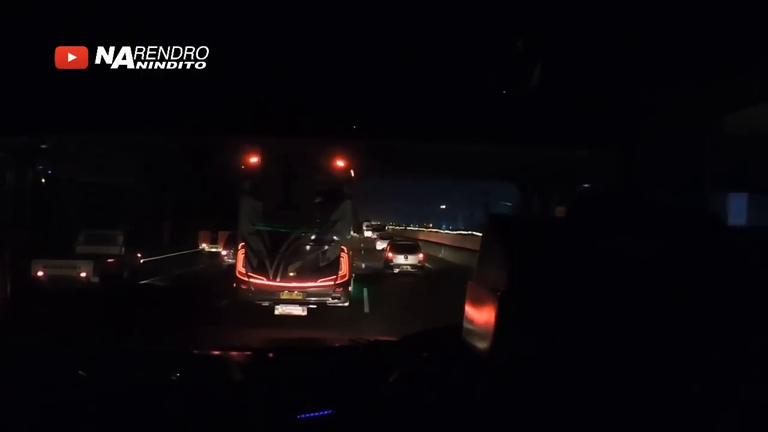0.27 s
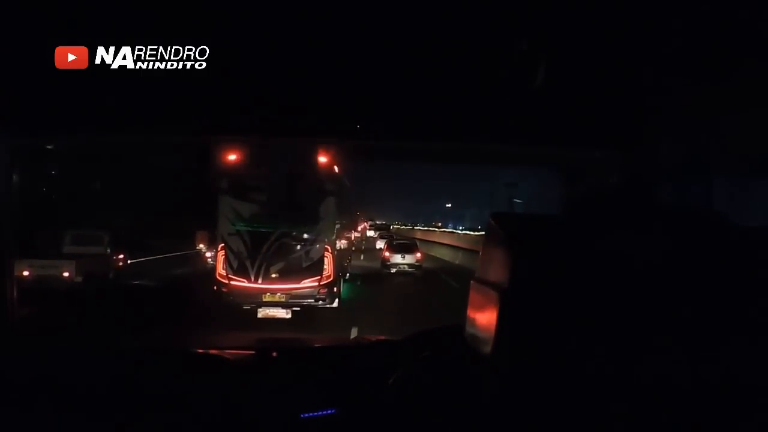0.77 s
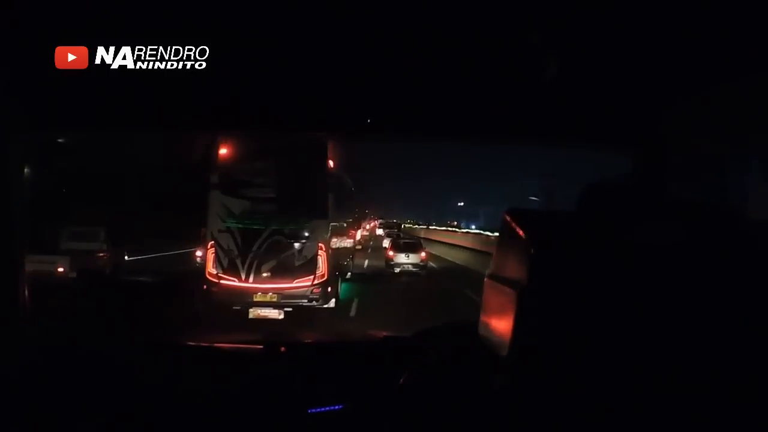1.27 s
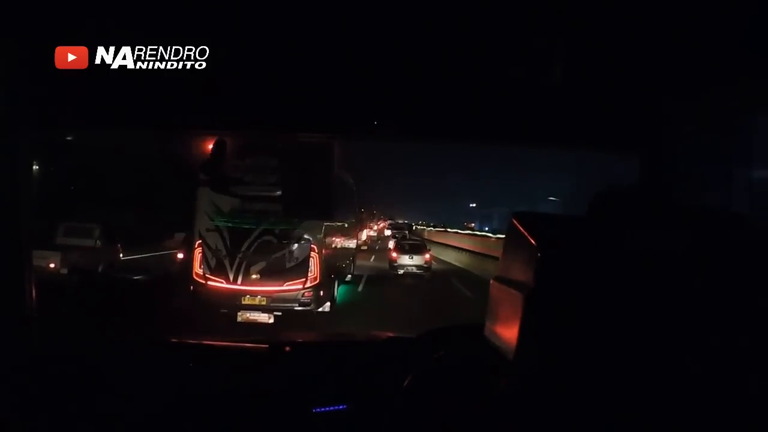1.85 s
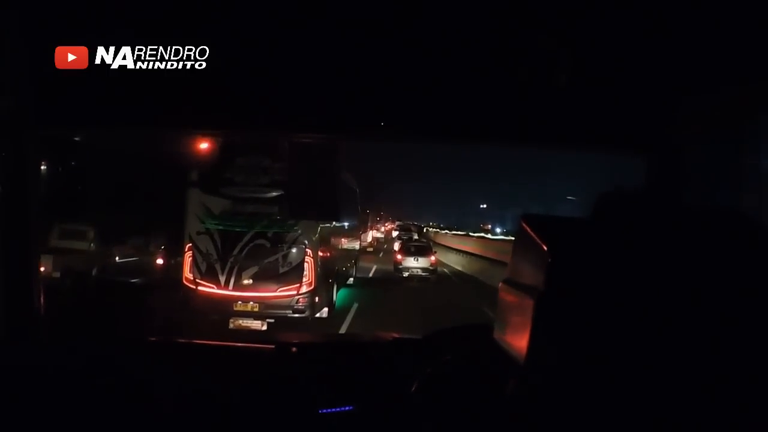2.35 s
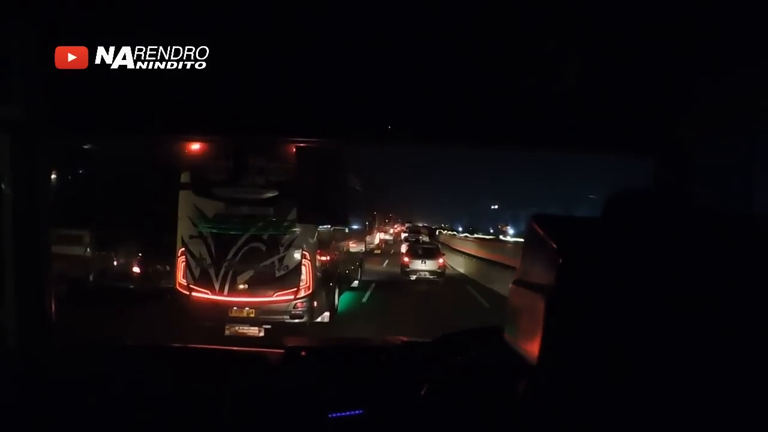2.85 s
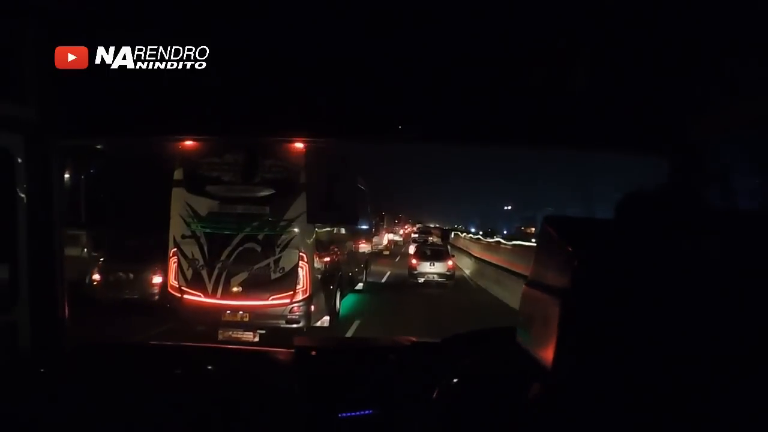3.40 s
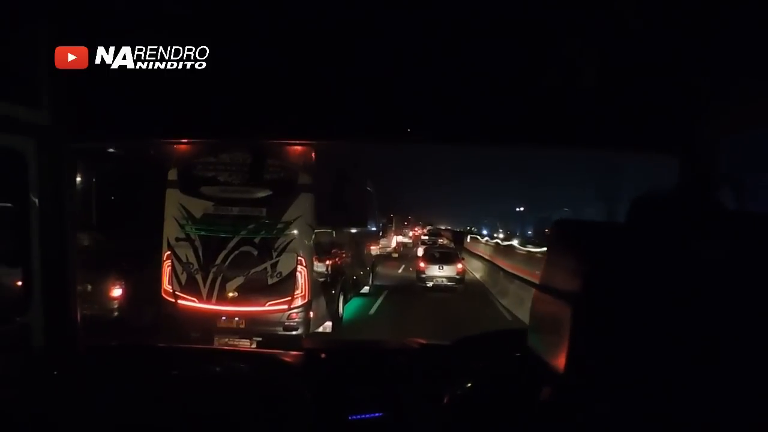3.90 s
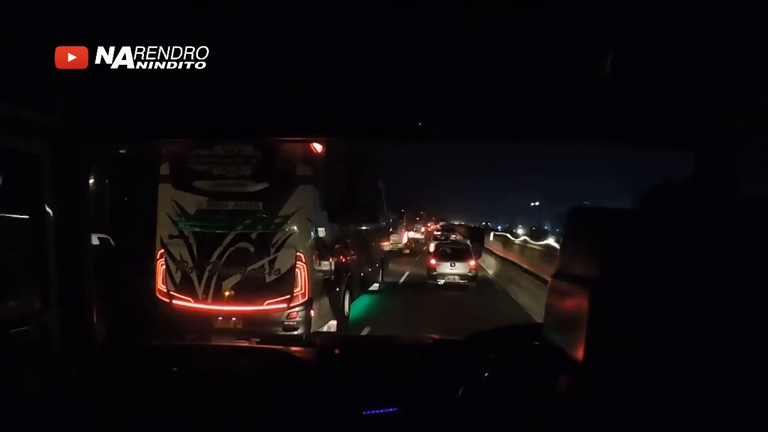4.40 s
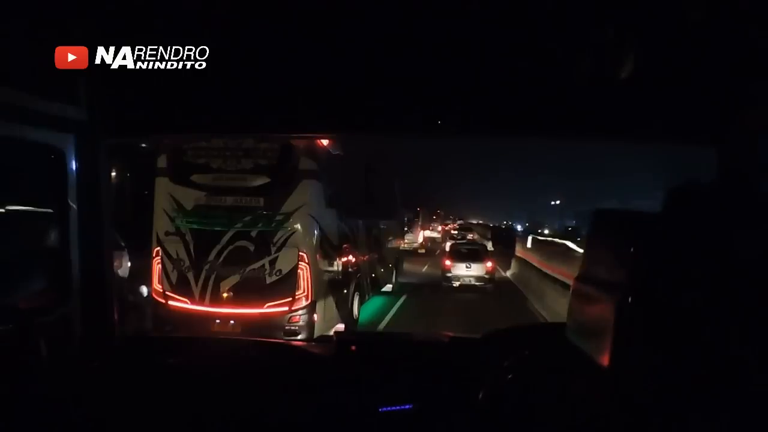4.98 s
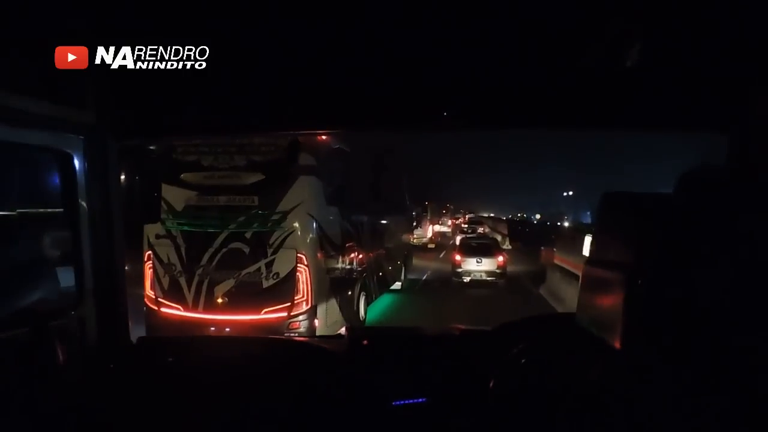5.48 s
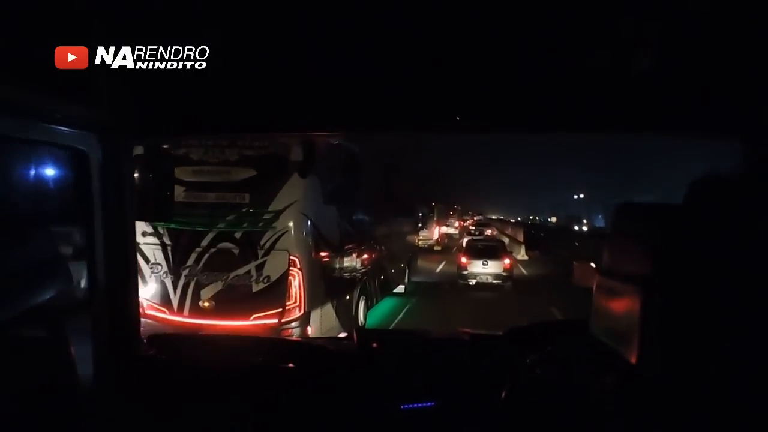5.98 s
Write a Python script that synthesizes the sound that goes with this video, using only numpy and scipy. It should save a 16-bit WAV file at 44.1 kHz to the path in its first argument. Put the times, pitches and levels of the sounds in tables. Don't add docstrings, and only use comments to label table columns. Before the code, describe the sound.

Inside a bus cab in slow night traffic, a low diesel drone around seventy hertz hums through the floor, wavering and rising only slightly in pitch over six seconds. Dull road and engine roar leaks through panels, with very deep, soft jolts throughout. It begins subdued; from about 1.5 to 2 s the engine takes load, the roar swells and a thin gear whine appears. The level dips near 3 s, crests around 3.6 s, then settles; load eases near 5.2 s and pulls briefly at 5.5 s. Faint trim squeaks sound at about 1.1, 2.6, 3.0, 4.3, 5.0, 5.3 and 6.0 s. Dry ticks are clearest at 1.6 and 2.65 s. A barely audible brake tone sings around 2.8-3 s. Quiet fan tones and slowly growing airy hiss persist while automatic microphone gain gently pumps.

```python
import sys
import numpy as np
from scipy import signal
from scipy.fft import rfft, irfft
from scipy.io import wavfile
from scipy.ndimage import uniform_filter1d

SR = 44100
rng = np.random.default_rng(int(sys.argv[2]) if len(sys.argv) > 2 else 0)


def voltage_ratio(decibels):
    exponent = np.asarray(decibels, float) / 20
    return 10 ** exponent


def to_wav(sig):
    pcm = np.clip(np.atleast_2d(sig), -1, 1) * 32767
    pcm = np.round(pcm).astype(np.int16)
    wavfile.write(sys.argv[1], SR, pcm.T)


N = 275625
TIME = np.arange(N) / SR
HZ = np.maximum(np.arange(N // 2 + 1) * SR / N, 1)


def rms_one(x):
    return x / np.sqrt(np.mean(x ** 2) + 1e-20)


def in_time(rows):
    s, *columns = np.transpose(rows)
    return [np.interp(TIME, s, column) for column in columns]


def at_hz(points, hz):
    table_hz, value = np.array(points)[:, 0], np.array(points)[:, 1]
    return np.interp(np.log(hz), np.log(table_hz), value)


def by_load(ends_db, load):
    return ends_db[0] + (ends_db[1] - ends_db[0]) * load


def drift(rate):
    r = np.exp(-80 * np.pi * rate / SR)
    settle = 2000
    slow = signal.lfilter([1], [1, -2 * r, r * r], rng.standard_normal(N // 40 + settle + 2))[settle:]
    return np.interp(np.arange(N) / 40, np.arange(len(slow)), rms_one(slow - slow.mean()))


def resonance(x, hz, width):
    r = np.exp(-np.pi * width / SR)
    zeros = np.array([1, 0, -1]) * (1 - r * r) / 2
    poles = [1, -2 * r * np.cos(2 * np.pi * hz / SR), r * r]
    return signal.lfilter(zeros, poles, x + 1e-18)


def pan(x, lean_db):
    return np.array([x * voltage_ratio(lean_db / 2), x * voltage_ratio(-lean_db / 2)])


def humps(events, rest_db):
    power = voltage_ratio(rest_db) ** 2
    for s, level_db, length, *_ in events:
        bell = np.exp(-4 * np.minimum(((TIME - s) / length) ** 2, 3))
        power = power + (voltage_ratio(level_db) * bell) ** 2
    return np.sqrt(power)


def lift_top(x, from_hz, gain_db):
    top = irfft(rfft(x) * np.clip(3 * np.log2(HZ / from_hz), 0, 1), N)
    return x + (voltage_ratio(gain_db) - 1) * top


# (frequency [Hz], left-right likeness [-1 to 1])
COHERENCE = [(21, -0.56), (61, 0.88), (310, 0.98), (525, 0.92), (910, 0.8), (1550, 0.6), (2650, -0.096),
             (4500, -0.35), (9000, -0.016)]
# (frequency [Hz], left minus right [dB])
BALANCE = [(18, 0), (36, -12), (61, 0.5), (141, 1.1), (325, 2.5), (760, 2), (1740, 0.3), (14000, 0.7)]


def patchy_noise(shape_db, unit_hz, patchy_db, octaves):
    mid, side = rfft(rng.standard_normal((2, N)))
    alike = np.clip(at_hz(COHERENCE, HZ), -1, 1)
    lean = voltage_ratio(at_hz(BALANCE, HZ) / 2)
    common, opposed = np.sqrt(1 + alike) * mid, np.sqrt(1 - alike) * side
    pair = np.array([(common + opposed) * lean, (common - opposed) / lean]) * voltage_ratio(shape_db)
    in_band = (HZ > unit_hz[0]) * (HZ < unit_hz[1])
    unit = np.std(irfft(pair.mean(axis=0) * in_band, N))
    out = 0
    for centre in octaves:
        share = np.clip(1 - abs(np.log2(HZ) - centre), 0, 1)
        out = out + irfft(pair * share, N) * voltage_ratio(patchy_db * drift(4.7))
    return out / unit


# (frequency [Hz], level [dB per Hz])
HISS_SPECTRUM = [(2500, -43), (3600, 3), (6500, -1.5), (7500, -5), (10800, -5), (12200, -1.5),
                 (14200, -1.5), (15700, -7)]
HISS_DB, HISS_RISE_DB_PER_S = -25, 0.34
VENT_DB, VENT_RISE_DB_PER_S = -2.5, 0.5


def hiss():
    shape_db = at_hz([(1500, -92.5)] + HISS_SPECTRUM, HZ)
    noise = patchy_noise(shape_db, (5000, 15000), 0.33, octaves=range(11, 15))
    vented = lift_top(noise, 9300, VENT_DB + VENT_RISE_DB_PER_S * TIME)
    return voltage_ratio(HISS_DB + HISS_RISE_DB_PER_S * TIME) * vented


# (time [s], level [dB], length [s])
BODY_JOLTS = [(.08, -22.5, 0.26), (.28, -18.5, 0.14), (.46, -22, 0.26), (.66, -22.5, 0.41),
              (1.0, -21.5, 0.2), (1.25, -18, 0.32), (1.75, -20, 0.54), (2.45, -16, 0.46),
              (2.82, -16.5, 0.13), (3.2, -24, 0.54), (3.4, -24, .22), (3.6, -22.5, .18), (3.82, -16, 0.2),
              (4.24, -19, .48), (4.7, -17.5, 0.23), (4.89, -19, .16), (5.23, -20.5, .31),
              (5.64, -16.5, 0.36), (6.09, -16, .36)]
# (time [s], level [dB], length [s])
ROUGH_PATCHES = [(.66, -23.5, 0.091), (1.28, -26, .3), (1.82, -25.5, .12), (2.64, -18.5, 0.086),
                 (3.49, -26, 0.38), (3.88, -25.5, 0.085), (4.05, -25.5, 0.38), (4.68, -18.5, 0.22),
                 (5.06, -22.5, 0.25), (5.48, -24.5, .29), (5.82, -27.5, .15)]
BOUNCE_HZ, BOUNCE_WANDER_HZ = 17.5, 0.79
BOUNCE_REST_DB, SHUDDER_REST_DB = -35.5, -31


def boom():
    bounce_hz = BOUNCE_HZ + BOUNCE_WANDER_HZ * drift(2.49)
    swing = -np.sqrt(2) * np.cos(2 * np.pi * np.cumsum(bounce_hz) / SR)
    shudder_band = (HZ > 22) * (HZ < 38) / HZ ** 2.5
    shudder = irfft(rfft(rng.standard_normal(N)) * shudder_band, N)
    shudder = shudder / np.sqrt(uniform_filter1d(shudder ** 2, size=6000))
    bounce = humps(BODY_JOLTS, BOUNCE_REST_DB) * swing
    shake = humps(ROUGH_PATCHES, SHUDDER_REST_DB) * voltage_ratio(-0.2) * shudder
    return pan(bounce, -5.2) + pan(shake, -3.6)


# (time [s], peak level [dB], left minus right [dB])
TRIM_TICKS = [
    (0.6554, -57, 0.0),
    (0.9607, -53.5, -1.0),
    (1.6267, -50, 2.0),
    (2.6519, -49, 1.5),
    (2.8244, -57, 1.0),
    (2.9791, -58, 0.5),
    (4.1294, -56, 0.0),
    (4.4994, -56, -0.5),
]


def ticks():
    length = 200
    out, age = np.zeros((2, N)), np.arange(length) / SR
    for s, peak_db, lean_db in TRIM_TICKS:
        snap = rng.standard_normal(length) * np.exp(-age / 0.0012)
        ring = resonance(resonance(snap, 9300, 4600), 9300, 6100)
        at = round(s * SR)
        out[:, at:at + length] += pan(voltage_ratio(peak_db + 2.0) * ring / np.max(abs(ring)), lean_db)
    return out


# (time [s], level [dB], rise [s], left minus right [dB])
TRIM_SQUEAKS = [(0.367, -61.5, 0.014, 2), (0.795, -60, .011, 2), (1.073, -52.5, 0.0084, 1),
                (2.587, -53.5, 0.013, 6), (3.012, -54, 0.012, 2), (4.346, -55, 0.01, .5),
                (5.029, -52, 0.012, -2), (5.080, -60, 0.011, 0), (5.302, -53.5, 0.01, 8),
                (6.040, -52, .014, 0), (6.103, -52, 0.01, 4)]
# (frequency [Hz], width [Hz], level [dB])
TRIM_MODES = [(2917, 170, -2), (3050, 290, -7), (3270, 160, -12)]


def squeaks():
    rub = rng.standard_normal(N)
    tone = 0
    for hz, width, top_db in TRIM_MODES:
        tone = tone + voltage_ratio(top_db) * resonance(resonance(rub, hz, width), hz, width)
    tone = tone / np.sqrt(uniform_filter1d(tone ** 2, size=500))
    out, age = np.zeros((2, N)), np.arange(4000) / SR
    for s, level_db, rise, lean_db in TRIM_SQUEAKS:
        at = round((s - rise) * SR)
        hump = voltage_ratio(level_db - 2.5) * age / rise * np.exp(1 - age / rise)
        out[:, at:at + len(age)] += pan(tone[at:at + len(age)] * hump ** 2 / hump.max(), lean_db)
    return out


# (time [s], level [dB], length [s])
SHOE_RUBS = [
    (2.77, -66, 0.11),
    (2.95, -70, 0.36),
]


def brake():
    angle = 2 * np.pi * 2706 * TIME + 0.8 * drift(8.0)
    return np.sqrt(2) * humps(SHOE_RUBS, -100) * np.sin(angle)


# (frequency [Hz], level above roar [dB])
FAN_TONES = [(679, -16), (719, -17), (849, -18), (890, -23)]


def whines():
    tones = 0
    for hz, level_db in FAN_TONES:
        level = voltage_ratio(level_db + 2.7 * drift(3.8))
        tones = tones + level * np.sin(2 * np.pi * hz * TIME + 0.92 * drift(2.3))
    return pan(np.sqrt(2) * tones, 3.6)


GEAR_HZ, GEAR_RISE_HZ_PER_S = 938, 4.0
GEAR_DB = (-40.5, -10.5)


def gears(load):
    mean_hz = GEAR_HZ + GEAR_RISE_HZ_PER_S * TIME / 2
    angle = 2 * np.pi * mean_hz * TIME + drift(5.0)
    level = voltage_ratio(by_load(GEAR_DB, load) + 2.0 * drift(2.8))
    return pan(np.sqrt(2) * level * np.sin(angle), 1.9)


# (frequency [Hz], level [dB per Hz])
ROAR_DENSITY = [(25, -22), (40, 12), (52, 13), (62, 11),
                (71, 10.5), (95, 5), (222, 0), (333, -6.5), (474, -12.5), (605, -11), (965, -17),
                 (1055, -15), (2910, -26), (3510, -35.5)]
# (frequency [Hz], width [Hz], level [dB])
PANEL_MODES = [(566, 32, 4), (693, 12, -1), (733, 13, 2.5), (808, 50, 5.5), (868, 15, 2.5), (906, 25, 4.5),
               (960, 84, 3.5), (1030, 67, -3), (1232, 73, 2.5)]
CLATTER_DB = (-3, 0.5)


def roar(crank_angle, load):
    shape_db = at_hz(ROAR_DENSITY + [(5600, -82)], HZ)
    for hz, width, top_db in PANEL_MODES:
        shape_db = shape_db + top_db / (1 + (2 * (HZ - hz) / width) ** 2)
    knock = 1 + 0.05 * np.cos(3 * crank_angle)
    noise = knock * patchy_noise(shape_db, (300, 2200), 0.65, octaves=range(4, 13))
    return lift_top(noise, 2030, by_load(CLATTER_DB, load))


# (multiple of crank speed [1], level above roar [dB])
CRANK_ORDERS = [(4, -6), (5, -8), (6, -11), (7, -14.5), (8, -12), (9, -3), (10, -12), (12, -15)]


def engine_orders(crank_angle):
    out = 0
    for multiple, level_db in CRANK_ORDERS:
        wobble = rng.uniform(0, 2 * np.pi) + 0.39 * drift(1.7)
        level = np.sqrt(2) * voltage_ratio(level_db + 1.58 * drift(1.16))
        out = out + pan(level * np.sin(multiple * crank_angle + wobble), 0.84)
    return out


# (time [s], level [dB], length [s], pitch [Hz])
FIRING_SWELLS = [(0.08, -30.5, 0.15, 69.4), (0.29, -29.5, 0.39, 68.3), (0.74, -28.5, 0.34, 69),
                 (1.2, -25.5, 0.2, 67.85), (1.63, -32.5, 0.25, 69.06), (2.12, -26.5, 0.25, 70.3),
                 (2.35, -32.0, 0.17, 69.0), (2.78, -31, 0.31, 71.8), (3.3, -30.5, 0.14, 70.6),
                 (3.47, -31.5, 0.15, 69.45), (3.6, -27.5, 0.24, 70.4), (3.97, -29.5, 0.12, 71.6),
                 (4.12, -27.5, 0.19, 71.7), (4.57, -33.5, 0.15, 70.1), (4.82, -28, 0.24, 70.6),
                 (5.02, -31.5, 0.1, 71.1), (5.24, -28.5, 0.17, 68.8), (5.36, -34, 0.092, 68.7),
                 (5.59, -29.5, 0.13, 71.3), (5.83, -36, 0.1, 70.7), (5.96, -40, 0.09, 70.6),
                 (6.08, -27.5, 0.15, 72)]


def firing_note():
    pitch_hz = in_time(FIRING_SWELLS)[-1]
    angle = 2 * np.pi * np.cumsum(pitch_hz) / SR + 0.12 * drift(6.5)
    level = np.sqrt(2) * voltage_ratio(0.14) * humps(FIRING_SWELLS, -46.5)
    return level * np.sin([angle + 0.32, angle - 0.22])


# (time [s], level [dB])
GAIN_COURSE = [
    (0, -47),
    (.93, -44.5),
    (2.07, -40.5),
    (2.66, -46),
    (3.11, -47.5),
    (3.65, -38.5),
    (4.23, -44.5),
    (5.02, -44.5),
    (6.25, -43.5),
]
# (time of the top [s], height [dB])
GAIN_RECOVERIES = [(.6, 2), (1.17, 4), (1.69, 1), (2.36, 5.5), (2.56, 1.5), (2.75, 3), (3.47, 1.5),
                   (4.12, 1.5), (4.7, 4.5), (5.5, 6), (5.65, 3), (6.1, 2.5)]
CLIMB_DB_PER_S, PULL_BACK_S = 17, 0.094


def gain_db():
    course_db = in_time(GAIN_COURSE)[0]
    for s, top_db in GAIN_RECOVERIES:
        corners = [s - top_db / CLIMB_DB_PER_S, s, s + PULL_BACK_S]
        course_db = course_db + np.interp(TIME, corners, [0, top_db, 0])
    return course_db


# (time [s], speed [turns per s])
CRANK_SPEED = [(0.01, 23.11), (1.1, 23.16), (2.25, 23.41), (3.85, 23.81), (4.65, 24.01), (6.24, 24.21)]
# (time [s], load [0 to 1], unevenness of the cylinders [dB])
ENGINE_LOAD = [(0, 0, 1.5), (1.5, 0.35, -0.5), (1.8, 0.94, 1.5), (2.8, 0.98, 4.5), (3.2, 0.83, 3),
               (3.9, 0.72, 0), (4.5, 0.57, 2), (4.9, 0.6, -8), (5.2, 0.31, -4.5), (5.5, .9, -1.5),
               (5.8, .45, -2), (6.25, .55, -5.5)]
ORDERS_FOLLOW = 0.48
FLUTTER_DB = 0.77


def scene():
    roar_db = gain_db()
    load, uneven_db = in_time(ENGINE_LOAD)
    crank_angle = 2 * np.pi * np.cumsum(in_time(CRANK_SPEED)[0]) / SR
    orders_db = uneven_db - (1 - ORDERS_FOLLOW) * (roar_db - roar_db.mean())
    engine = roar(crank_angle, load) + voltage_ratio(orders_db) * engine_orders(crank_angle)
    cab = voltage_ratio(roar_db + 0.22) * (hiss() + whines() + gears(load) + engine)
    rest = boom() + ticks() + squeaks() + brake() + firing_note()
    return cab * voltage_ratio(FLUTTER_DB * drift(14.0)) + rest


def low_pass(x):
    return signal.sosfilt(signal.butter(12, 15720, fs=SR, output="sos"), x)


def record(dry):
    held = 0.7 * np.tanh(dry / 0.7)
    return low_pass(held)


dry = scene()
out = record(dry)
to_wav(out)
```